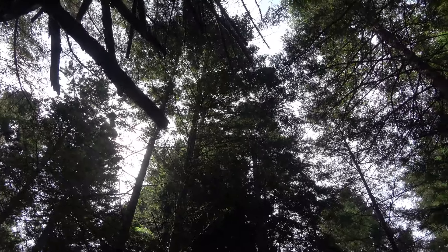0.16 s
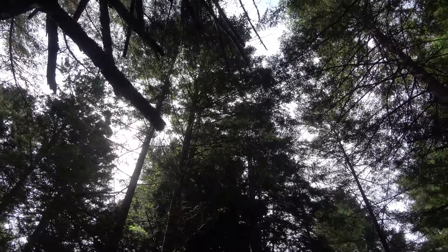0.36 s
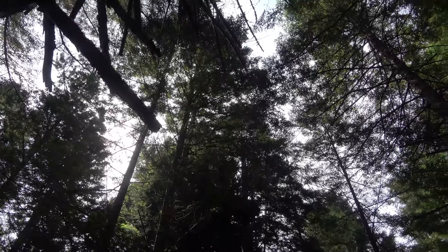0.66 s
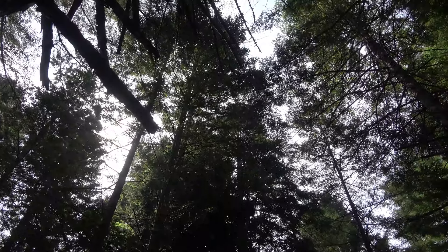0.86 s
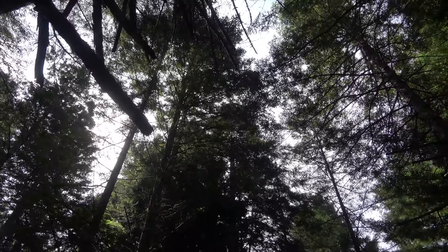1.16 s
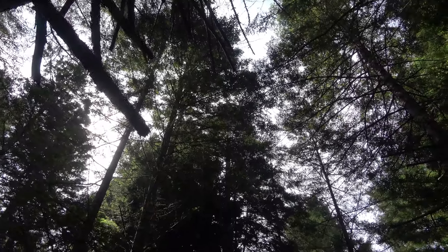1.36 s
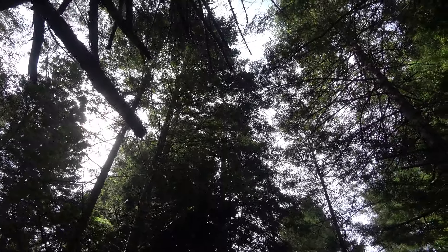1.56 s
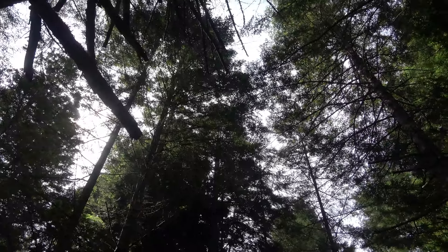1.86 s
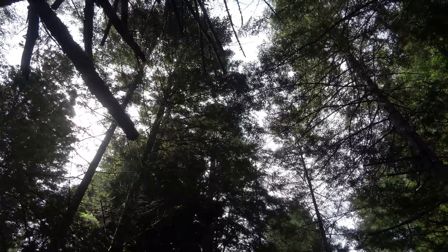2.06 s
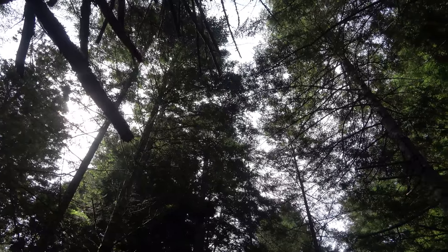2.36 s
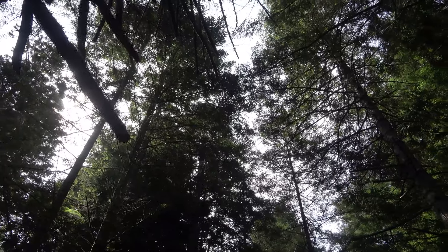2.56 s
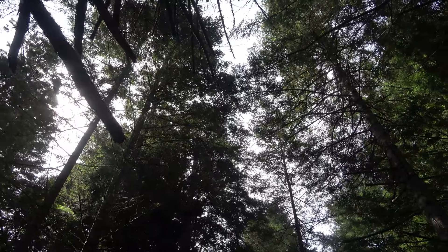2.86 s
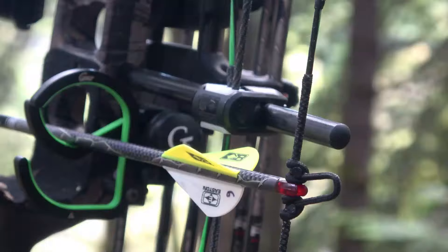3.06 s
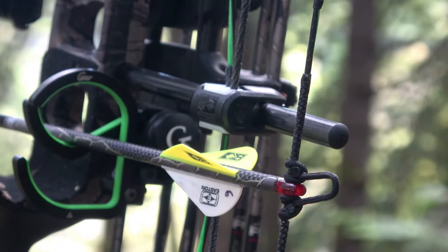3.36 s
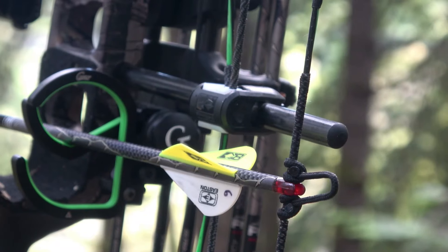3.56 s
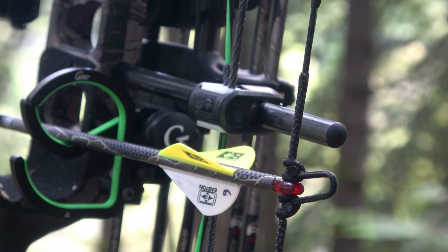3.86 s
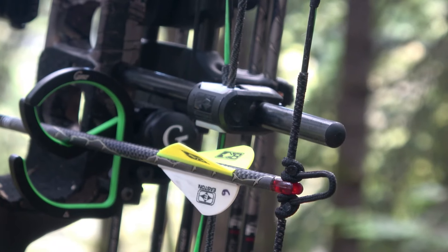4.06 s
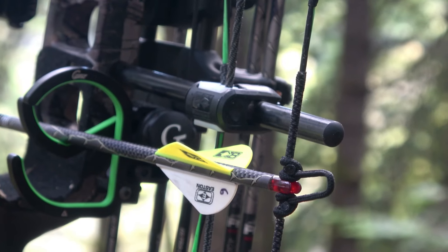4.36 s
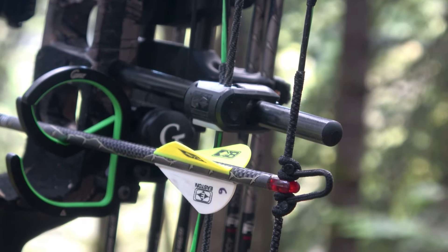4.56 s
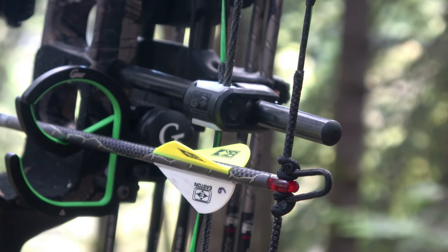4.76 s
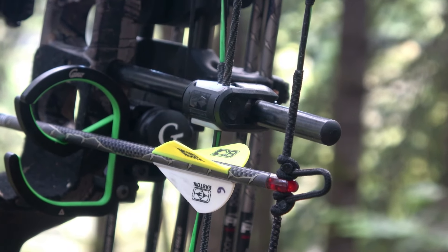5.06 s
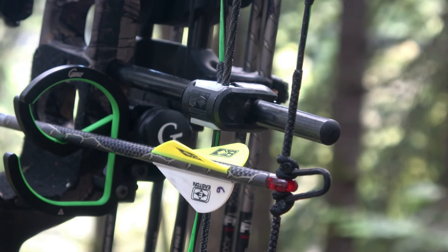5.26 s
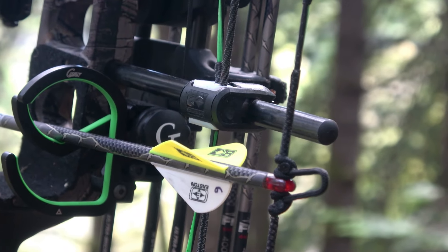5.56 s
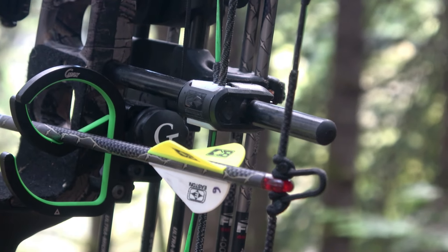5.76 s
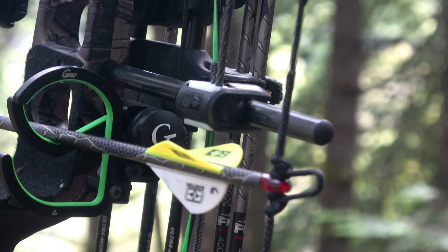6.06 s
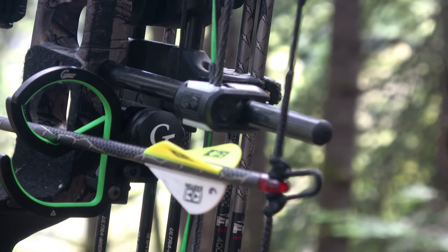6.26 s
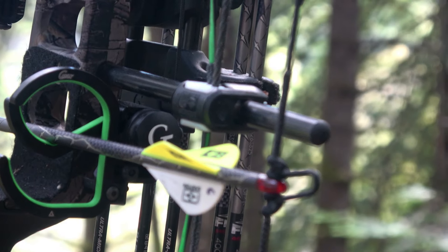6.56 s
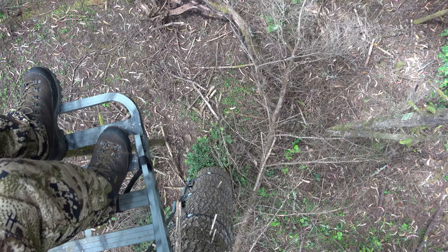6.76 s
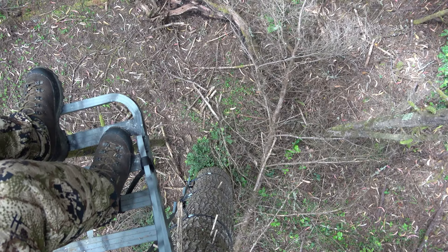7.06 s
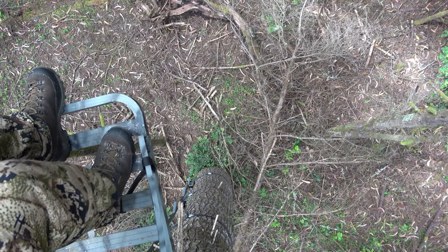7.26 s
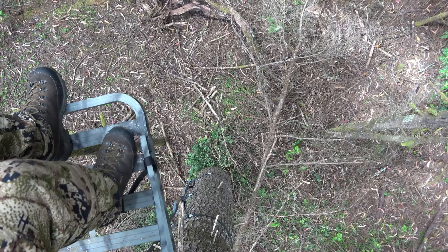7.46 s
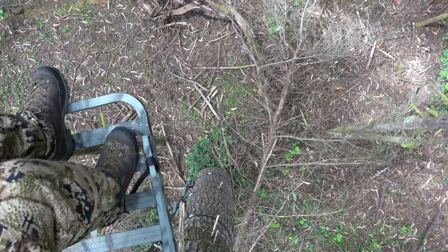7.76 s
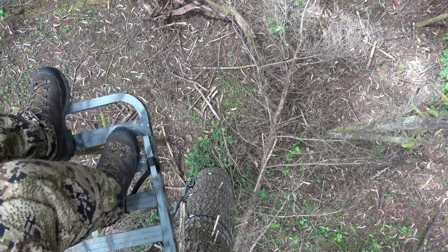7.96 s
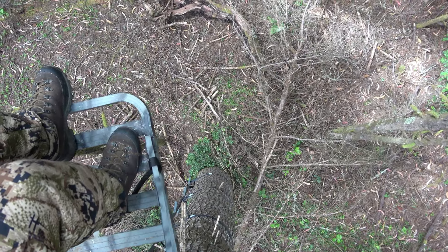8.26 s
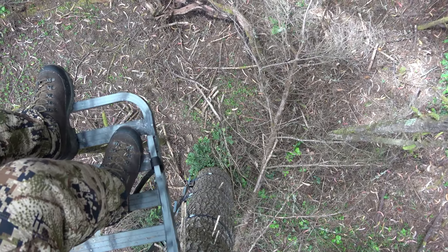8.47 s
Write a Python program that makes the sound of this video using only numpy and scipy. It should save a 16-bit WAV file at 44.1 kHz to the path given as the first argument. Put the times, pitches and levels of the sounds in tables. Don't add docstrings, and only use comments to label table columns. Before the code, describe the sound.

Small birds call with thin high chirps and short whistles among conifers, over soft wind wash, low rumbling air and two faint thumps.

```python
import sys
import numpy as np
from scipy import signal
from scipy.fft import rfft, irfft
from scipy.io import wavfile
from scipy.ndimage import uniform_filter1d

SR = 44100
rng = np.random.default_rng(int(sys.argv[2]) if len(sys.argv) > 2 else 0)


def volts_from_decibels(level):
    exponent = np.asarray(level, float) / 20
    return 10 ** exponent


def master_out(mix):
    frames = np.transpose(np.atleast_2d(mix))
    ceiling = np.clip(frames, -1, 1)
    pcm = np.round(ceiling * 32767).astype(np.int16)
    wavfile.write(sys.argv[1], SR, pcm)


N = 380583


def swells(rows):
    t = np.arange(0, N / SR + 1, 1 / 1000)
    curve = sum(height * np.exp(-(2 * (t - s) / length) ** 2) for s, length, height in rows)
    return np.interp(np.arange(N) / SR, t, curve)


# (time [s], length [s], level [dB])
NUDGES = [(0.075, 0.15, -40), (0.366, 0.48, -42.5), (0.829, 0.43, -40.5), (1.046, 0.13, -41),
          (1.279, 0.22, -39), (1.746, 0.58, -39.5), (2.173, 0.32, -37.5), (2.642, 0.47, -34),
          (2.981, 0.17, -29.5), (3.147, 0.14, -41), (3.601, 0.32, -44.5), (4.049, 0.37, -39),
          (4.38, .25, -42.5), (4.551, 0.15, -38.5), (4.82, 0.27, -41), (5.17, 0.22, -38),
          (5.443, .25, -43.5), (5.898, 0.34, -48.5), (6.321, 0.32, -43.5), (6.698, 0.26, -40),
          (6.963, 0.19, -39.5), (7.22, 0.19, -37), (7.618, 0.69, -38.5), (8.102, 0.25, -47),
          (8.453, 0.33, -38.5)]
SWAY_HZ = [10.18, 12.3, 10.7]


def rocking(moment):
    t = np.arange(0, N / SR + 1, 1 / 1000)
    rock = np.zeros(len(t))
    for s, length, db in NUDGES:
        bell = np.exp(-(2 * (t - s) / length) ** 2)
        rock += np.sqrt(2) * volts_from_decibels(db) * bell * np.sin(2 * np.pi * SWAY_HZ[moment] * (t - s))
    return uniform_filter1d(np.interp(np.arange(N) / SR, t, rock), size=SR // 1000)


# (time [s], length [s], rise [dB])
GUSTS = [
    (1.25, .2, 8.9),
    (3.05, 0.26, 12),
    (3.98, 0.24, 20.4),
    (4.3, .3, 9.1),
    (5.2, 0.17, 3.3),
    (5.62, .2, 6.4),
    (6.7, 0.14, 7),
    (7.3, 0.47, 8.9),
]
CALM_DB = [-63, -56, -60]


def buffeting(moment):
    band = signal.butter(4, [17, 46], "band", fs=SR, output="sos")
    lumps = signal.lfilter([1], np.poly([.998, .998]), rng.standard_normal(N + SR))
    buffet = signal.sosfilt(band, lumps)[SR:]
    buffet = buffet / np.sqrt(np.mean(buffet ** 2) + 1e-20)
    return buffet * volts_from_decibels(CALM_DB[moment] + swells(GUSTS))


# (frequency [Hz], level [dB per Hz])
AIR = [
    [(32, -33.5), (55, -6.5), (65, -14), (70, -8), (123, -8), (203, -15), (488, -21), (823, -23),
     (1200, -27), (1850, -35.5), (4440, -44.5), (5370, -43.5), (8230, -49.5), (14900, -51.5), (16000, -51)],
    [(32, -21), (55, -17), (77, -5.5), (194, -9), (234, -7), (319, -11.5), (905, -13.5), (1200, -18),
     (3340, -36.5), (4040, -38.5), (4440, -43.5), (4880, -39.5), (8430, -48.5), (14900, -49.5),
     (16000, -57)],
    [(32, -35), (55, -3), (93, -0.5), (132, -1), (218, -3), (297, -5.5), (376, -6), (424, -10), (749, -4),
     (1530, -14.5), (1680, -18.5), (2180, -20.5), (6650, -38.5), (14200, -43.5), (16000, -46)],
]
# (level at 0 s [dB], change [dB/s])
WASH = [
    (-68, -0.06),
    (-57.5, -0.6475),
    (-58.5, -.4),
]
# (time [s], length [s], change [dB])
DRONE_SWELLS = [
    (.95, .2, -2.5),
    (1.28, 0.33, 4.5),
    (2.6, .25, 2),
    (4.1, .6, 2),
    (4.62, 0.38, -2.5),
    (5.5, 0.44, 1.5),
    (6.6, .25, 3),
    (6.9, 0.36, -0.5),
]
# (time [s], length [s], rise [dB])
RUSTLES = [
    (6.2, .35, 2.5),
]


def wind(moment, during):
    hz = np.maximum(np.arange(N // 2 + 1) * SR / N, 1)
    points = np.array(AIR[moment])
    colour_db = np.interp(np.log(hz), np.log(points[:, 0]), points[:, 1])
    noise = rfft(rng.standard_normal(N)) * volts_from_decibels(colour_db)
    middle = noise[(hz > 300) & (hz < 1500)]
    noise = noise * N / np.sqrt(2 * np.sum(np.abs(middle) ** 2))
    noise = noise * (hz < 15750)
    below_200 = 1 / (1 + (hz / 200) ** 4)
    below_4000 = 1 / (1 + (hz / 4000) ** 4)
    start_db, db_per_s = WASH[moment]
    db = start_db + db_per_s * np.arange(N) / SR
    usual_db = np.mean(db[during])
    drone = irfft(noise * below_200, N) * volts_from_decibels(swells(DRONE_SWELLS))
    wash = irfft(noise * (below_4000 - below_200), N)
    hiss = irfft(noise * (1 - below_4000), N) * volts_from_decibels(swells(RUSTLES))
    return wash * volts_from_decibels(db) + (drone + hiss) * volts_from_decibels(usual_db)


# (time [s], peak level [dB])
TICKS = [
    (3.051, -54),
    (3.26, -58),
]


def ticks():
    clicks = np.zeros(N)
    clicks[[round(s * SR) for s, db in TICKS]] = volts_from_decibels(np.array(TICKS)[:, 1])
    band = signal.butter(2, [1500, 7500], "band", fs=SR, output="sos")
    return 3 * signal.sosfilt(band, clicks + 1e-18)


# (near t60 [s], far t60 [s], far level [dB])
TRUNKS = [
    (.33, 1.6, -17),
    (.12, 1.05, -3),
    (.4, 1.5, -15),
]


def trunks(x, moment):
    near_t60, far_t60, far_db = TRUNKS[moment]
    t = np.arange(SR) / SR
    decay = volts_from_decibels(-60 * t / near_t60) + volts_from_decibels(far_db - 60 * t / far_t60)
    tail = decay * (1 - np.exp(-t / 0.0032)) * rng.standard_normal(SR)
    return signal.fftconvolve(x, tail / np.sqrt(np.sum(tail ** 2)))[:N]


def flutter(depth_db, rate):
    knots = np.arange(0, N + SR, SR / rate)
    return volts_from_decibels(depth_db * np.interp(np.arange(N), knots, rng.standard_normal(len(knots))))


def add(track, start_s, hz, level):
    at = round(start_s * SR)
    sine = np.sin(2 * np.pi * np.cumsum(hz) / SR)
    track[at:at + len(hz)] += (np.sqrt(2) * level * sine)[:N - at]


def notes(table, turn, bend_in, bend_out, loudest, swell, overtone_db=-45):
    track = np.zeros(N)
    for start, length, first, turning, last, db in table:
        u = np.linspace(0, 1, max(round(length * SR), 8))
        before = (first - turning) * np.clip(1 - u / turn, 0, 1) ** bend_in
        after = (last - turning) * np.clip((u - turn) / (1.001 - turn), 0, 1) ** bend_out
        hz = turning + before + after
        skewed = u ** (np.log(.5) / np.log(np.clip(loudest, .1, .9)))
        level = volts_from_decibels(db) * np.abs(np.sin(np.pi * skewed)) ** swell
        add(track, start, hz, level)
        add(track, start, 2 * hz, level * volts_from_decibels(overtone_db))
    return track


def shaped(table, first_share, last_share):
    return [(s, length, first_share * hz, hz, last_share * hz, db) for s, length, hz, db in table]


def phrases(table, rate, uneven, throb, edge_s):
    track, chance = np.zeros(N), rng.standard_normal((len(table), 64))
    for (start, length, centre, swing, db), row in zip(table, chance):
        t = np.arange(round(length * SR)) / SR
        wander = np.interp(t * rate, np.arange(64), row)
        turns = 2 * np.pi * np.cumsum(rate * np.exp(uneven * wander)) / SR + 3 * row[-1]
        edges = np.clip(np.minimum(t, length - t) / edge_s, 0, 1)
        level = volts_from_decibels(db + 5 * uneven * wander[::-1]) * edges * (1 - throb * np.cos(turns / 2) ** 2)
        add(track, start, centre + swing * np.sin(turns), level)
    return track


# (time [s], length [s], centre [Hz], swing [Hz], level [dB])
FAR_SONG = [(6.5, 0.39, 2115, 150, -76), (0.0, 0.22, 7750, 150, -86), (.14, .12, 7200, 150, -90),
            (.15, 0.23, 5450, 100, -88.5), (1.2, .05, 8000, 200, -86), (1.5, .07, 7300, 200, -83),
            (1.5, .04, 7100, 350, -79), (1.66, .12, 5550, 100, -83), (1.85, .17, 5380, 100, -87),
            (2.02, .06, 6400, 150, -86), (1.5, 0.083, 5700, 200, -87), (2.5, 0.042, 6350, 100, -76),
            (2.5, .07, 5800, 150, -86), (2.68, .08, 5350, 60, -85), (6.48, .12, 5400, 150, -79),
            (5.86, .04, 7800, 250, -86), (4.24, .05, 6400, 200, -86)]


def far_song():
    return phrases(FAR_SONG, rate=32, uneven=.25, throb=.15, edge_s=.015)


# (time [s], length [s], centre [Hz], level [dB])
LOW_SONG = [
    (.685, .17, 2440, -80),
    (.9, .35, 2510, -77.5),
    (1.26, .14, 2520, -87),
    (2.385, .1, 2490, -76),
    (2.49, .12, 2520, -83),
    (2.612, .11, 2540, -76),
    (2.72, .1, 2540, -83),
    (2.82, .12, 2540, -78),
    (2.95, .12, 2520, -83),
    (4.85, .08, 4740, -75),
]


def low_song():
    rows = [(s, length, hz, 65, db) for s, length, hz, db in LOW_SONG]
    return phrases(rows, rate=30, uneven=.15, throb=.2, edge_s=.01)


# (time [s], length [s], top [Hz], reach down [Hz], level [dB])
BUZZES = [(3.963, 0.031, 9000, 798, -72), (3.995, .05, 8500, 704, -82), (3.86, .1, 6940, 2020, -84),
          (4.335, 0.11, 8000, 3170, -72.5), (4.43, .09, 8200, 3300, -73), (4.55, .085, 8000, 2960, -74),
          (4.65, 0.062, 7800, 2500, -84), (4.33, .15, 9600, 915, -91), (6.35, 0.086, 7180, 2470, -67),
          (6.46, 0.068, 7470, 1970, -72), (6.52, .05, 7480, 2640, -68), (6.57, .07, 7100, 2490, -74)]


def buzzes(rate, uneven, top_heavy):
    track, chance = np.zeros(N), rng.standard_normal((len(BUZZES), 3, 32))
    for (start, length, top, reach, db), (pace, depth, force) in zip(BUZZES, chance):
        t = np.arange(round(length * SR)) / SR
        strokes = np.cumsum(rate * np.exp(uneven * np.interp(t * rate, np.arange(32), pace))) / SR
        k, u = np.minimum(strokes.astype(int), 31), strokes % 1
        fall = np.abs(2 * u - .8) * np.clip(0.97 + 0.16 * depth[k], .2, 1.2)
        swell = np.sin(np.pi * t / length) ** 0.36 * np.sin(np.pi * u) ** .5
        level = volts_from_decibels(db + force[k] - top_heavy * fall) * swell
        add(track, start, top * (1 + 0.0136 * depth[k - 1]) - reach * fall, level)
    return track


# (time [s], length [s], centre [Hz], swing [Hz], level [dB])
WARBLES = [
    (1.03, .089, 6720, 110, -87),
    (5.595, .035, 7850, 120, -83.5),
    (5.625, .22, 7500, 130, -85.5),
    (6.315, .071, 7550, 60, -72),
    (6.375, .08, 6700, 120, -72),
    (6.52, .045, 6850, 150, -69.5),
    (6.565, .065, 6100, 150, -70.5),
]


def warbles():
    return phrases(WARBLES, rate=42, uneven=.3, throb=.34, edge_s=.0074)


# (time [s], length [s], first [Hz], last [Hz], level [dB])
FLICKS = [
    (4.314, .026, 5000, 9700, -79),
    (3.992, .012, 8000, 6400, -77),
    (6.340, .011, 6630, 5030, -72),
    (8.552, .02, 6110, 8500, -87),
    (8.603, .008, 6000, 9550, -84),
]
# (time [s], level [dB])
GRACES = [
    (4.352, -76),
    (5.073, -82),
    (5.374, -74),
    (5.558, -72),
    (5.820, -77),
    (6.090, -74),
]


def flicks():
    sweeps = FLICKS + [(s, .012, 4500, 7500, db) for s, db in GRACES]
    rows = [(s, length, first, last, last, db) for s, length, first, last, db in sweeps]
    return notes(rows, turn=.99, bend_in=1.1, bend_out=1.1, loudest=.4, swell=.6)


# (time [s], first [Hz], turning [Hz], last [Hz], level [dB])
SEEPS = [
    (.631, 7900, 9050, 7950, -75),
    (.783, 10000, 10350, 10200, -82),
    (.797, 9900, 9700, 8750, -78),
    (.938, 9300, 9650, 9400, -82),
    (.958, 9500, 9100, 8800, -78),
    (1.024, 8700, 9200, 8500, -78),
    (1.013, 7800, 8250, 7550, -75),
    (.078, 6300, 5900, 5700, -78),
]


def seeps():
    rows = [(s, .025, *rest) for s, *rest in SEEPS]
    return notes(rows, turn=.3, bend_in=2.1, bend_out=1.6, loudest=.4, swell=.45)


# (time [s], length [s], first [Hz], turning [Hz], level [dB])
HOOKS = [
    (.494, .066, 6800, 6300, -73.5),
    (1.408, .066, 7050, 6520, -69.5),
    (3.016, .06, 7200, 6420, -69),
    (2.226, .032, 7600, 6620, -60),
]


def hooks():
    rows = [(s, length, first, hz, 1.145 * hz, db) for s, length, first, hz, db in HOOKS]
    return notes(rows, turn=.35, bend_in=2.1, bend_out=1.6, loudest=.42, swell=.35, overtone_db=-28)


# (time [s], length [s], level [dB])
SLIDES = [
    (.001, .072, -76),
    (.806, .088, -76),
    (1.574, .1, -73.5),
    (2.324, .098, -76),
]


def slides():
    floor_hz, hz_per_s = 3900, 21500
    rows = [(s, length, floor_hz + hz_per_s * length, floor_hz, floor_hz, db) for s, length, db in SLIDES]
    return notes(rows, turn=.99, bend_in=1.55, bend_out=1.1, loudest=.38, swell=.3)


# (time [s], length [s], turning [Hz], level [dB])
LOW_ARCHES = [
    (4.117, 0.029, 2574, -64),
    (4.341, .027, 2580, -67),
    (4.601, 0.035, 2590, -68),
    (5.959, 0.033, 2590, -69.5),
    (6.177, 0.027, 2600, -66),
    (6.439, .024, 2585, -65),
]


def low_arches():
    rows = shaped(LOW_ARCHES, .905, .95)
    return notes(rows, turn=.49, bend_in=2.1, bend_out=2.1, loudest=.45, swell=.85)


# (time [s], length [s], turning [Hz], level [dB])
LONG_ARCHES = [
    (3.254, 0.06, 4595, -64.5),
    (4.464, 0.063, 4560, -63),
    (4.659, .057, 4650, -64),
    (4.772, 0.078, 4720, -64),
]


def long_arches():
    rows = shaped(LONG_ARCHES, .74, .86)
    return notes(rows, turn=.32, bend_in=3.6, bend_out=2.5, loudest=.44, swell=.8)


# (time [s], length [s], turning [Hz], level [dB])
ARCHES = [(3.118, 0.048, 4650, -66), (3.713, 0.043, 4580, -65), (3.909, 0.046, 4570, -63),
          (4.12, 0.05, 4570, -64), (4.322, .054, 4560, -63.5), (5.079, 0.047, 4570, -65.5),
          (5.38, 0.046, 4433, -62), (5.565, .048, 4550, -63), (5.827, 0.048, 4600, -64),
          (6.095, .049, 4505, -64), (6.346, .055, 4440, -62.5)]


def arches():
    rows = shaped(ARCHES, .74, .8)
    return notes(rows, turn=.4, bend_in=3.1, bend_out=2.2, loudest=.46, swell=1.0)


def birds():
    # (track, flutter depth [dB], direct level [dB], level among the trunks [dB])
    singers = [(far_song(), 5, -7, -4),
               (low_song(), 4, -4, -4),
               (buzzes(rate=100, uneven=.25, top_heavy=1.5), 6, -6, -2),
               (warbles(), 5.5, -2, -3),
               (flicks(), 3, -3, -7),
               (seeps(), 3, -1, -6),
               (hooks(), 2, 0, -1),
               (slides(), 4.5, -1, -3),
               (low_arches(), 1.5, 0, -6.5),
               (long_arches(), 1, 0, -4.5),
               (arches(), 1, 0, -4)]
    direct = sum(x * flutter(depth_db, 220) * volts_from_decibels(direct_db) for x, depth_db, direct_db, far_db in singers)
    far = sum(x * volts_from_decibels(far_db) for x, depth_db, direct_db, far_db in singers)
    return direct, far


# (time [s], jump of the waveform [full scale])
SPLICES = [
    (3.09444, -.017),
    (6.64544, .009),
]


def scene():
    direct, far = birds()
    direct = direct + ticks()
    cuts = [round(s * SR) for s, jump in SPLICES]
    moment = np.searchsorted(cuts, np.arange(N), side="right")
    out = np.zeros(N)
    for k in range(3):
        here = moment == k
        out += here * (rocking(k) + buffeting(k) + wind(k, here) + direct + trunks(far * here, k))
    for at, (s, jump) in zip(cuts, SPLICES):
        missing = jump - (out[at] - out[at - 1])
        t = (np.arange(N) - at + .5) / SR
        out += missing / 2 * np.sign(t) * np.exp(-np.abs(t) / 0.023)
    return out[None]


def band_limit(x):
    return signal.sosfilt(signal.butter(12, 16410, fs=SR, output="sos"), x)


def record(dry):
    return band_limit(dry)


dry = scene()
out = record(dry)
master_out(out)
```